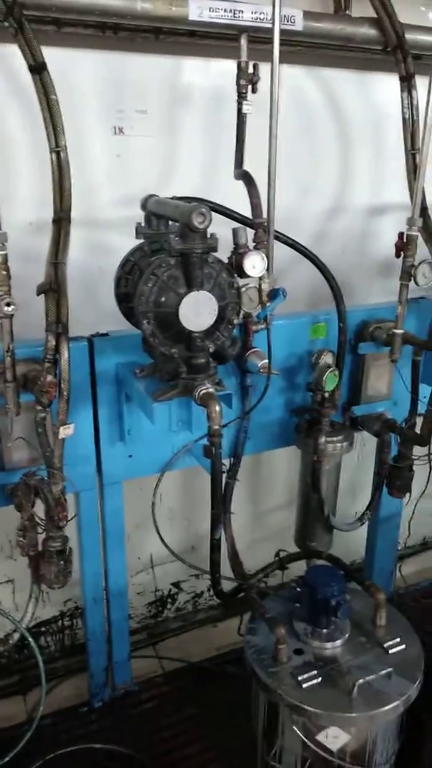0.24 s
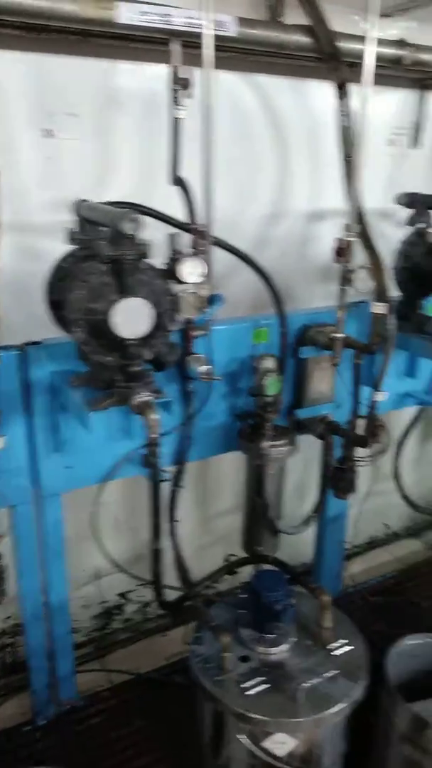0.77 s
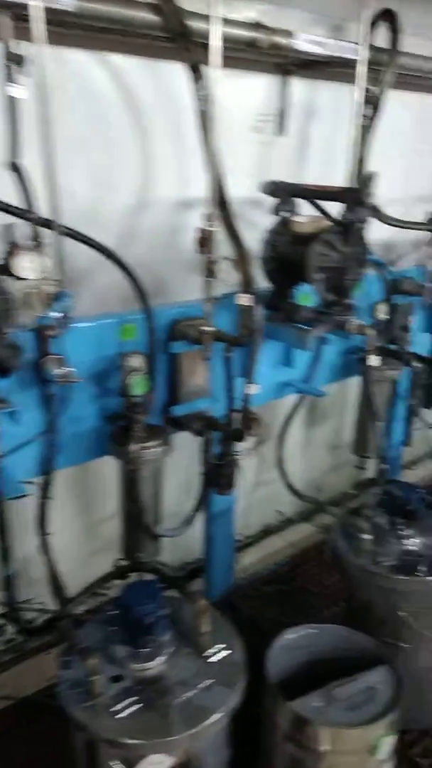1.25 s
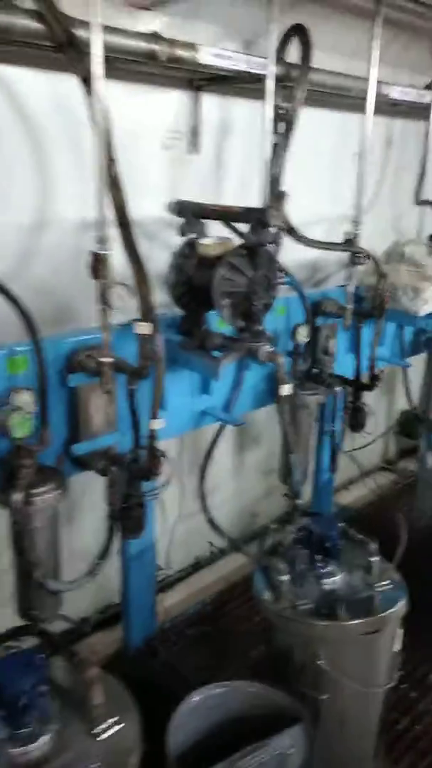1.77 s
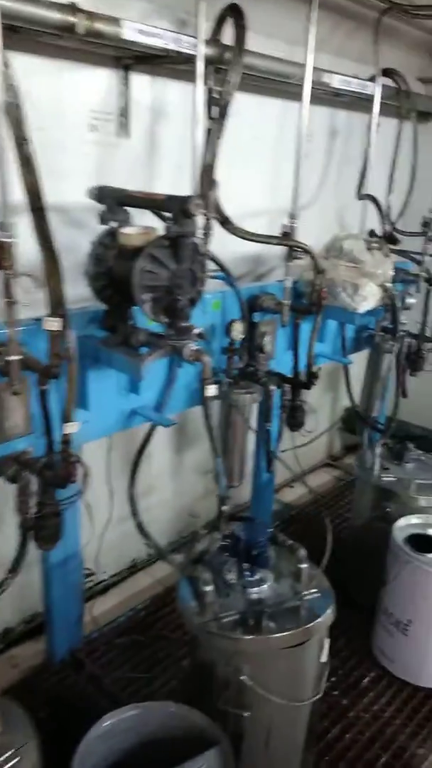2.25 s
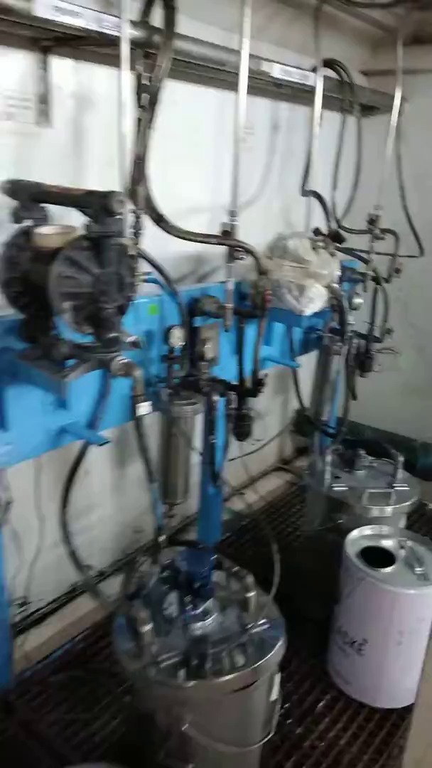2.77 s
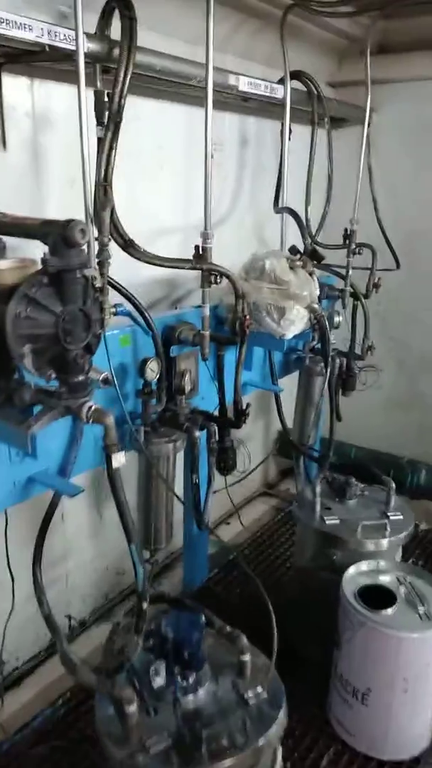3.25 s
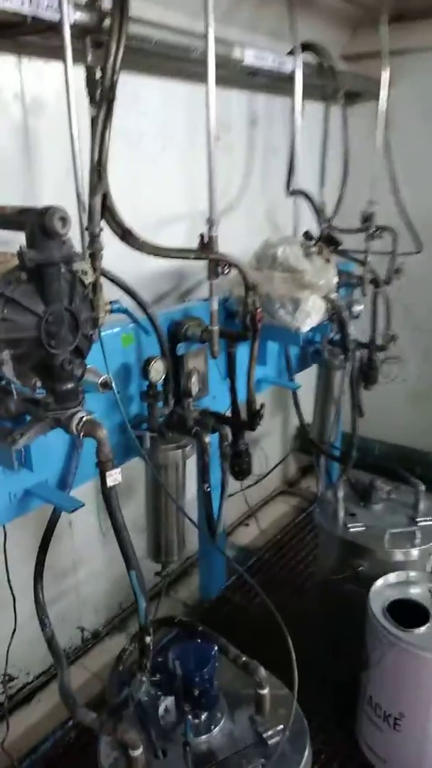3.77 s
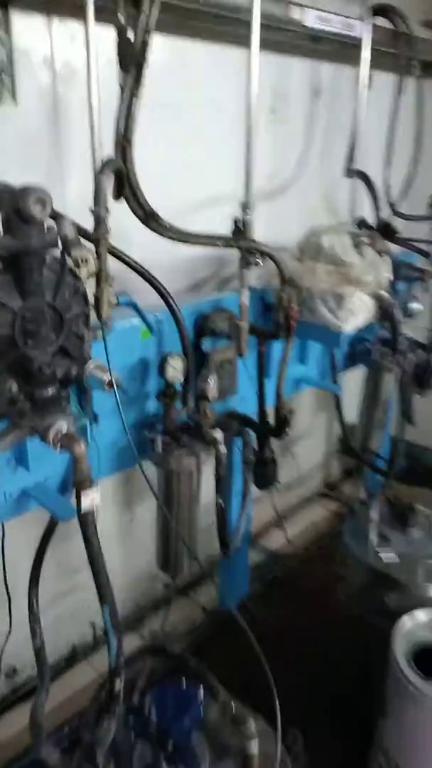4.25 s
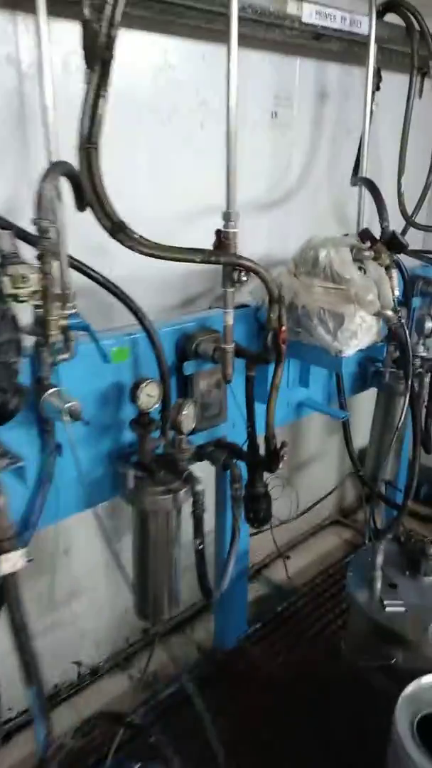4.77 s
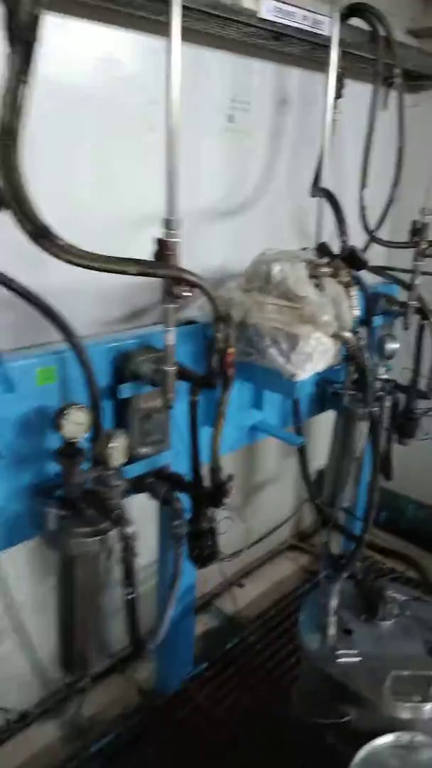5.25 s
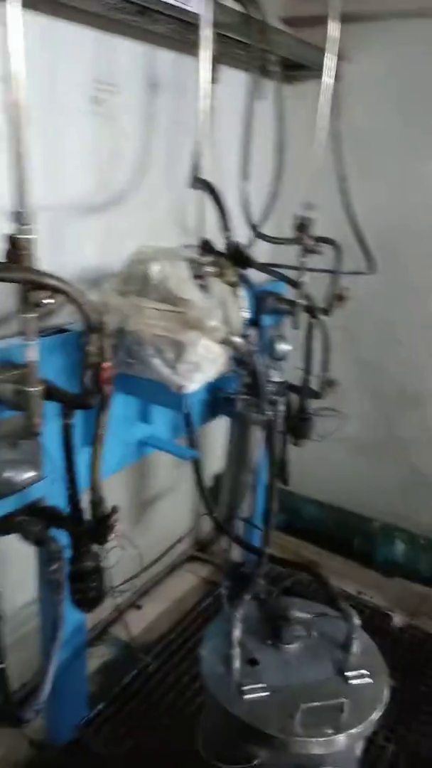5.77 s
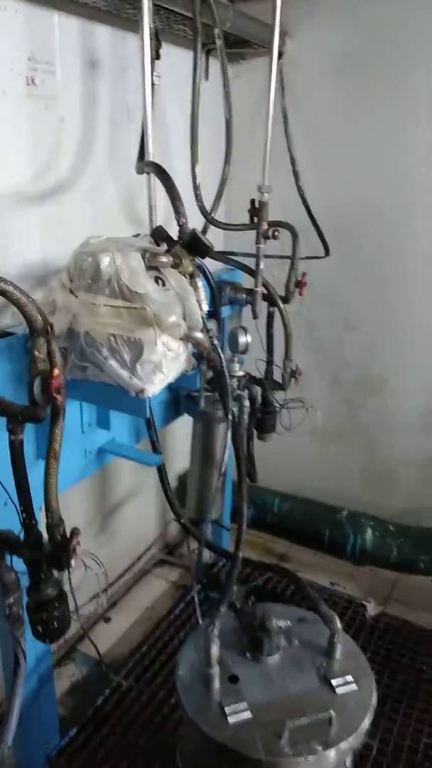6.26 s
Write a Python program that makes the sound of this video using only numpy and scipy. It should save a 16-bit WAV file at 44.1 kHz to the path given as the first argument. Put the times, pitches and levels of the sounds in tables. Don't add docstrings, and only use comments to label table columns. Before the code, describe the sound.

Overlapping pneumatic puffs, some crisp and short, others longer and softer, come several times a second from pumps at different paces. Low booming rumble swells under each stroke, and fittings leak a faint constant hiss. Whistling blasts stand out early, midway and late, and one hard burst lands around two and a half seconds. The small recorder picks up wide, slightly hollow stereo in a reflective industrial room.

```python
import sys
import numpy as np
from scipy import signal
from scipy.fft import rfft, irfft, next_fast_len
from scipy.io import wavfile
from scipy.ndimage import uniform_filter1d, map_coordinates

SR = 44100
rng = np.random.default_rng(int(sys.argv[2]) if len(sys.argv) > 2 else 0)


def makeup_ratio(level_db):
    decades = np.asarray(level_db, float) / 20
    return 10 ** decades


def dump_mix(stems):
    frames = np.atleast_2d(stems).T
    limited = np.clip(frames, -1, 1)
    pcm = np.round(limited * 32767).astype(np.int16)
    wavfile.write(sys.argv[1], SR, pcm)


N = 287532

# t/s, hiss level/dB, venting time/s, diaphragm shove level/dB
STEADY = [
    (0.632, -21, 0.063, -37),
    (1.409, -19, 0.048, -36.5),
    (2.192, -20, 0.06, -31.5),
    (2.965, -24, 0.073, -37),
    (3.7514, -22, 0.091, -34),
    (4.5194, -22.5, 0.14, -44),
    (5.3045, -24.5, 0.13, -37),
    (6.072, -21, 0.097, -35),
]
QUICK = [
    (0.4844, -21, 0.19, -30),
    (1.199, -22.5, 0.12, -31),
    (1.8914, -26, 0.07, -30.5),
    (2.5944, -27.5, 0.074, -69),
    (3.3044, -26.5, 0.19, -35.5),
    (4.0188, -24, 0.11, -32),
    (4.7174, -22, .071, -32),
    (5.4324, -25.5, 0.18, -34),
    (6.1594, -26.5, 0.091, -35),
]
SLOW = [
    (0.2694, -25.5, 0.13, -32.5),
    (1.3344, -28.5, 0.19, -34),
    (2.3594, -26, 0.15, -32.5),
    (3.4354, -28, 0.051, -35.5),
    (4.454, -23.5, 0.11, -30),
    (5.5294, -23, 0.034, -38.5),
]
BIG = [
    (0.0364, -22.5, 0.094, -31.5),
    (1.7024, -24, 0.095, -32.5),
    (4.1194, -19.5, .092, -33),
    (5.7694, -22, 0.044, -32.5),
]
STRAY = [
    (0.3644, -22, 0.048, -31.5),
    (1.5694, -26.5, 0.12, -33),
    (1.8044, -25.5, 0.3, -39.5),
    (2.08, -53.5, 0.093, -38),
    (3.5964, -25.5, .07, -34),
    (4.33, -34, 0.027, -31),
    (5.0194, -27.5, 0.047, -60),
    (5.6544, -27, 0.25, -34.5),
    (6.41, -35, 0.1, -35.5),
]
TIGHT = [
    (2.4964, -18, 0.04, -75),
]
WHISTLER = [
    (0.8444, -17, 0.078, -39),
    (3.184, -16.5, 0.052, -38),
    (4.9552, -17.5, 0.049, -40.5),
]
# strokes, valve opening time/s, fizz re hiss/dB, body re shove/dB, boom re shove/dB
PLAIN = [
    (STEADY, 0.0015, -8.5, 6.8, -7),
    (QUICK, 0.0026, -10, 4.6, -7.5),
    (SLOW, 0.01, -12, 5.1, -2.5),
    (BIG, 0.018, -13, 6.9, -0.39),
    (STRAY, 0.011, -9.5, 4.9, -11),
    (TIGHT, .0015, -12, 5.6, -10),
]
RINGING = [
    (WHISTLER, 0.0022, -11, 14.4, -3.5),
]


def unit(x):
    return x / np.sqrt(np.mean(x ** 2) + 1e-20)


def along(points, hz, count=1):
    table = np.transpose(points)
    return np.interp(np.log(hz + 1), np.log(table[0] + 1), table[count])


def wobble(rate):
    knots = rng.standard_normal(int(N * rate / SR) + 4)
    return map_coordinates(knots, [np.arange(N) * rate / SR])


def filtered(x, response):
    m = next_fast_len(N + 2048, real=True)
    return irfft(rfft(x, m) * response(np.fft.rfftfreq(m, 1 / SR)), m)[..., :N]


def patches(shape, size):
    field = uniform_filter1d(rng.standard_normal(shape), size=size[0], axis=0)
    return unit(uniform_filter1d(field, size=size[1], axis=1))


def rush(gain, patchy_db, streak_db, size=1024):
    z = signal.stft(rng.standard_normal((2, N)), nperseg=size)[2]
    streak_frames = max(10240 // size, 2)
    field_db = patchy_db * patches(z.shape[1:], size=(12, 5))
    field_db = field_db + streak_db * patches(z.shape[1:], size=(3, streak_frames))
    pair = signal.istft(z * makeup_ratio(field_db), nperseg=size)[1][:, :N]
    return unit(filtered(pair, gain))


def leaks():
    # f/Hz, level/dB per Hz
    leak_spectrum = [(100, -6.5), (400, -5.5), (800, -1), (1500, -6.5), (3000, -14), (6000, -7.5),
                     (9000, -21), (12000, 1), (14200, -17)]
    hiss = rush(lambda hz: makeup_ratio(along(leak_spectrum, hz)), patchy_db=1.0, streak_db=2.5)
    return makeup_ratio(-37.0 + 0.18 * wobble(5.5)) * hiss


def rise(late, rise_s):
    return 0.5 + 0.5 * np.tanh(late / (2 * rise_s))


def shoves(booming, lasts):
    lag_s, rise_s, decay_s = 0.01, 0.034, 0.15 * lasts
    idle_db = -45 - 6.5 * booming
    t = np.arange(0, N, 128) / SR
    power = np.full(len(t), makeup_ratio(idle_db) ** 2)
    for strokes, *_, boom_db in PLAIN + RINGING:
        for flip_s, _, _, shove_db in strokes:
            late = t - flip_s - lag_s
            travel = rise(late, rise_s) * np.exp(-np.maximum(late, 0) / decay_s)
            power += (makeup_ratio(shove_db + booming * boom_db) * travel) ** 2
    return np.interp(np.arange(N) / SR, t, np.sqrt(power))


def chambers():
    # f/Hz, level/dB per Hz
    rumble_spectrum = [(25, -52), (40, -25), (55, -5), (75, -5), (100, -1.5), (130, -6.5), (170, -10),
                       (230, -5), (350, -7.5), (600, -11), (1200, -15.5)]
    # f/Hz, width/Hz
    chamber_mode = (166.8, 47)
    centre_hz, width_hz = chamber_mode
    resonance = lambda hz: 1 / (1 + (2 * (hz - centre_hz) / width_hz) ** 2)
    rumble = rush(lambda hz: makeup_ratio(along(rumble_spectrum, hz)), patchy_db=1.0, streak_db=2.5, size=4096)
    boom = rush(resonance, patchy_db=-0.5, streak_db=1.0, size=4096)
    rumble = makeup_ratio(4.5 + 0.84 * wobble(18)) * shoves(0, lasts=1.83) * rumble
    return rumble + makeup_ratio(1.5) * shoves(1, lasts=0.88) * boom


def blowdown(group, part, steep, rush_share):
    t = np.arange(0, N, 32) / SR
    power = np.zeros(len(t))
    for strokes, valve_s, fizz_db, body_db, _ in group:
        for flip_s, hiss_db, vent_s, shove_db in strokes:
            brighter_db = 0.2 * (hiss_db + 21.5)
            levels_db = {"body": shove_db + body_db, "hiss": hiss_db, "fizz": hiss_db + fizz_db + brighter_db}
            late = np.maximum(t - flip_s, 0)
            pressure = np.exp(-steep * (late / vent_s) ** 1.49)
            pop = 1 + rush_share * np.exp(-late / 0.01)
            power += (makeup_ratio(levels_db[part]) * rise(t - flip_s, valve_s) * pop * pressure) ** 2
    return np.interp(np.arange(N) / SR, t, np.sqrt(power))


def exhaust(group, colour, streak_db):
    over = lambda hz, edge_hz: 1 / np.sqrt(1 + (edge_hz / (hz + 1)) ** 8)
    under = lambda hz, edge_hz: 1 / np.sqrt(1 + (hz / edge_hz) ** 8)
    body = rush(lambda hz: colour(hz) * under(hz, 1780), 0.53, 0.58 * streak_db)
    hiss = rush(lambda hz: colour(hz) * over(hz, 1920) * under(hz, 6490), 1.7, streak_db)
    fizz = rush(lambda hz: colour(hz) * over(hz, 6700), 0.99, 1.72 * streak_db)
    body = makeup_ratio(-7.5) * blowdown(group, "body", steep=0.44, rush_share=0.15) * body
    hiss = makeup_ratio(-5) * blowdown(group, "hiss", steep=0.69, rush_share=0.43) * hiss
    fizz = makeup_ratio(6.5) * blowdown(group, "fizz", steep=0.94, rush_share=0.81) * fizz
    flutter = makeup_ratio(1.07 * wobble(40))
    return flutter * (body + hiss + fizz)


def pumps():
    # f/Hz, level/dB per Hz
    jet_spectrum = [(200, -16.5), (450, -3.5), (1300, 0), (3000, 2), (6000, -4), (8000, -3), (11000, 7),
                    (13000, 9.5), (14200, -0.5)]
    # f/Hz, width/Hz, level/dB
    muffler_modes = [(1420, 97, -5.5), (2590, 330, -5), (3190, 47, 8), (4260, 350, 0.5), (5360, 110, 10),
                     (6330, 270, 1.5), (7320, 200, 6), (8700, 270, -11), (9070, 310, 13), (10800, 210, 1),
                     (11300, 250, 14), (13340, 600, 13)]
    # f/Hz, width/Hz
    side_cavities = [(4600, 99), (6950, 300), (8600, 290), (9900, 1300)]

    def jet(f):
        return makeup_ratio(along(jet_spectrum, f))

    def whistle(f):
        ringing = 0.98 + sum(makeup_ratio(db) * 1j * f * w / (c * c - f * f + 1j * f * w) for c, w, db in muffler_modes)
        dips = [1 - 0.85 / (1 + (2 * (f - c) / w) ** 2) for c, w in side_cavities]
        return jet(f) * ringing * np.prod(dips, axis=0)

    return exhaust(PLAIN, jet, streak_db=3.5) + exhaust(RINGING, whistle, streak_db=2.0)


def room(x):
    # f/Hz, reverberation time t60/s
    decay_times = [(200, 1.8), (1000, 1.05), (4000, 0.62), (12000, 0.36)]
    hz, t, z = signal.stft(x, SR, nperseg=512)
    keep = makeup_ratio(-120 * (t[1] - t[0]) / along(decay_times, hz))
    power = np.abs(z) ** 2
    stored = np.array([signal.lfilter([0, 1 - k], [1, -k], power[:, i]) for i, k in enumerate(keep)])
    stored = stored.transpose(1, 0, 2)
    fresh = signal.stft(rng.standard_normal(x.shape), SR, nperseg=512)[2]
    diffuse = unit(np.abs(fresh)) * np.exp(1j * np.angle(fresh))
    return signal.istft(diffuse * np.sqrt(stored), SR, nperseg=512)[1][:, :N]


def scene():
    air = pumps()
    return air + room(air) + chambers() + leaks()


def likeness(hz, drift, spread):
    # f/Hz, share in step, share through the port spacing, lean to one end
    coherence = [(100, .72, .12, .2), (450, .47, .2, .0), (800, .38, .5, .05), (1065, .2, .76, .0),
                 (1500, .0, .93, .0), (2100, .0, .945, .0), (3200, .0, .975, .1), (3900, .0, .95, .42),
                 (4500, .0, .975, .35), (5600, .0, .82, .62), (6800, .0, .88, .5), (7700, .0, .55, .45),
                 (9500, .0, .33, .25), (13500, .0, .08, .1)]
    spacing_hz, shift_hz = 2290, 190
    turn = 2 * np.pi * (hz + shift_hz) / spacing_hz * drift
    turn = turn + 0.14 * (1 - np.cos(turn)) * (hz > 2100)
    alike = along(coherence, hz) - along(coherence, hz, count=2) * np.cos(turn)
    alike = alike + 1j * along(coherence, hz, count=3) * np.sin(turn)
    size = np.clip(np.abs(alike), 0.01, 0.995)
    return alike / np.abs(alike + 1e-9) * size ** spread


def band_limit(x):
    return signal.sosfilt(signal.butter(12, 14710, fs=SR, output="sos"), x)


def record(dry):
    # f/Hz, level/dB
    port_colour = [(1300, 2), (1800, -1), (2200, 3.5), (2700, -1.5), (3000, -6), (3400, -4), (3900, 0),
                   (4200, 0), (4650, -3), (5300, -0.5), (5650, -2), (6250, 0), (6900, -2), (14500, -14.5)]
    # f/Hz, left minus right/dB
    balance = [(60, -1), (170, 2.5), (450, 1), (1000, 0.2), (3200, 2), (4200, 3.5), (6000, 5), (10000, 4),
               (12500, 2)]
    band = lambda hz: (hz < 14270) / (1 + (38 / (hz + 1)) ** 4)
    coloured = filtered(dry, lambda hz: makeup_ratio(along(port_colour, hz)) * band(hz))
    hz, t, (a, b) = signal.stft(coloured, SR, nperseg=1024)
    frame_at = np.minimum(t * SR, N - 1).astype(int)
    drift = 1 + 0.005 * wobble(7)[frame_at]
    burst_db = 10 * np.log10(np.mean(np.abs(a[40:]) ** 2, axis=0) + 1e-12)
    burst_db = np.clip(burst_db - uniform_filter1d(burst_db, size=28), -4, 6)
    spread = makeup_ratio(3 * patches(a.shape, size=(24, 10)) - 0.9 * burst_db - 3)
    alike = likeness(hz[:, None], drift, spread)
    lean = makeup_ratio(along(balance, hz)[:, None] * (1 - 0.25 * alike.real ** 4) / 2)
    left = lean * a
    right = (alike * a + np.sqrt(1 - np.abs(alike) ** 2) * b) / lean
    mix = signal.istft(np.array([left, right]), SR, nperseg=1024)[1][:, :N]
    return band_limit(mix)


dry = scene()
out = record(dry)
dump_mix(out)
```